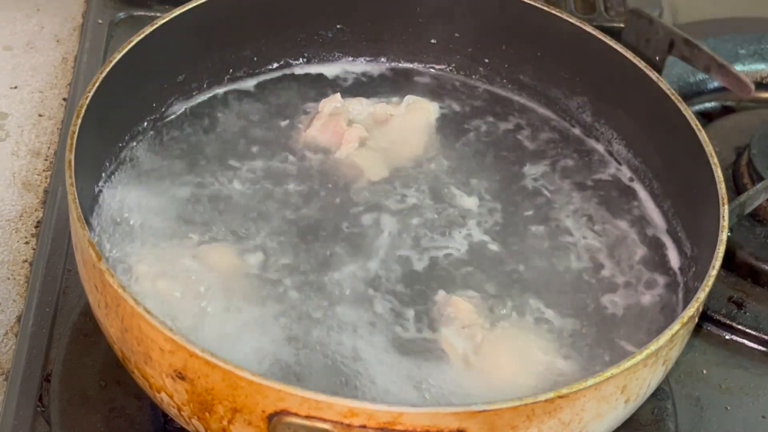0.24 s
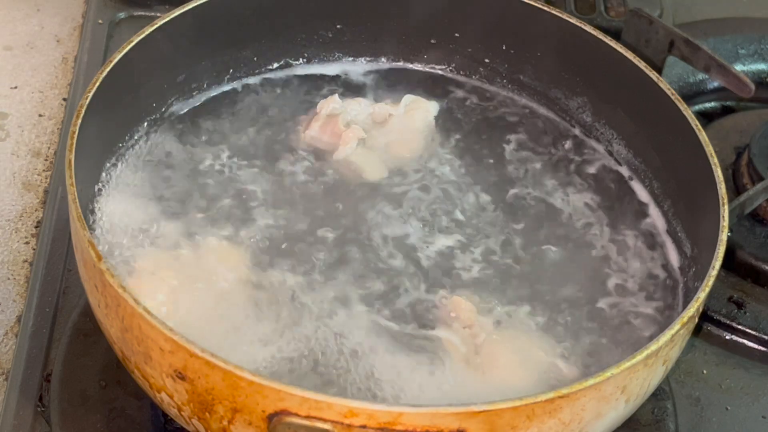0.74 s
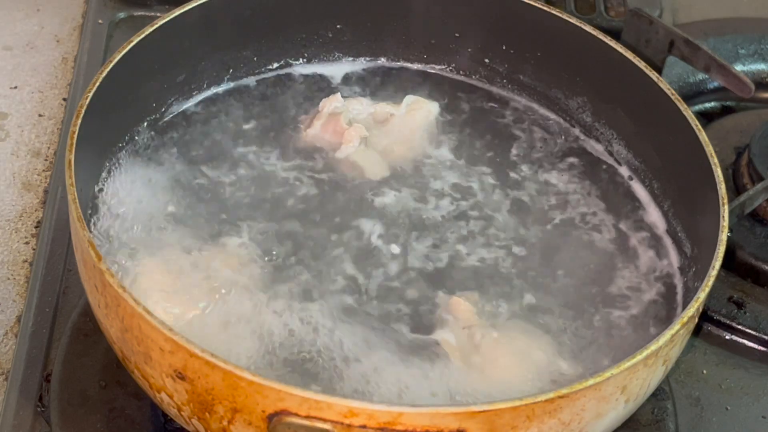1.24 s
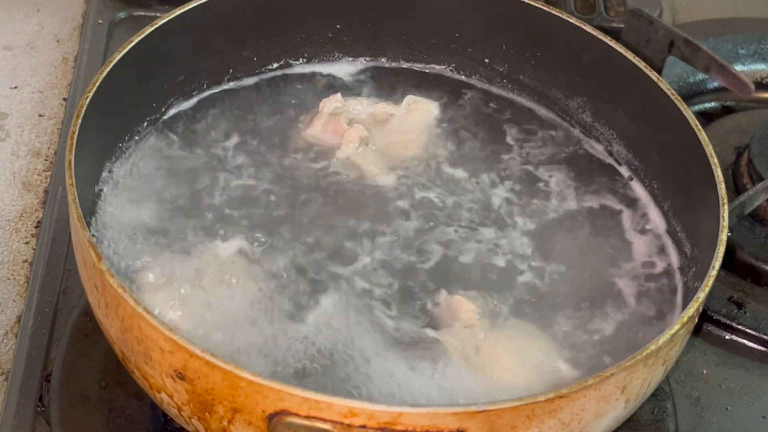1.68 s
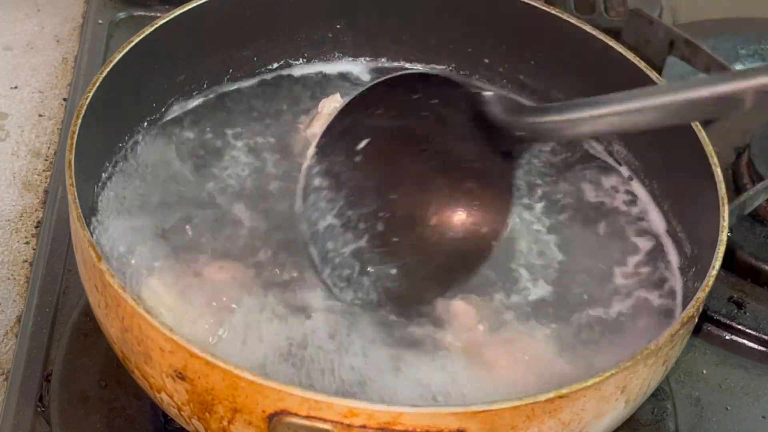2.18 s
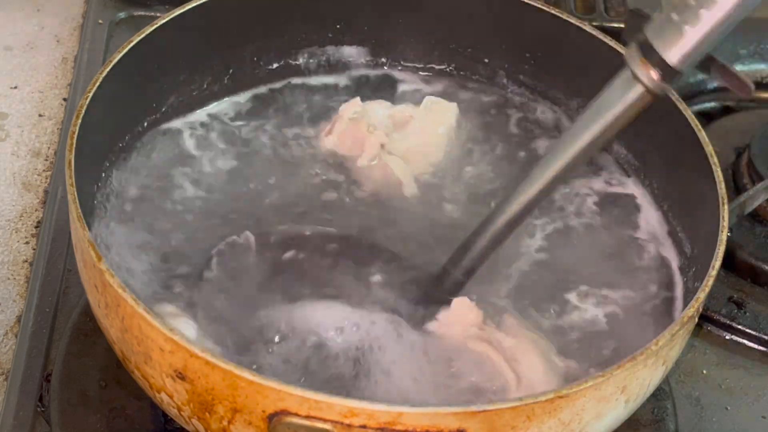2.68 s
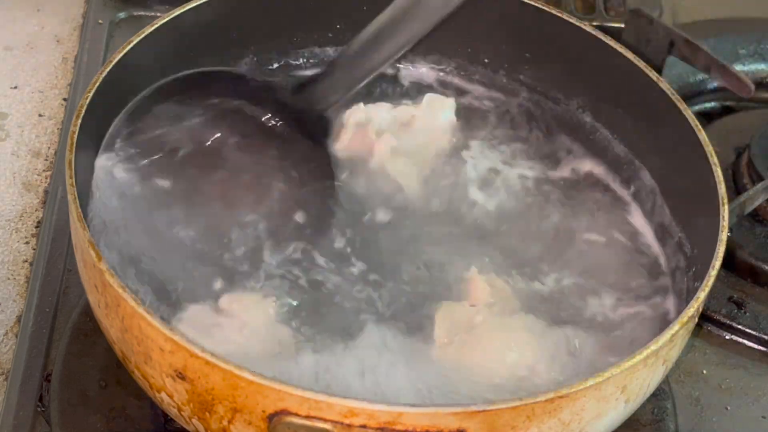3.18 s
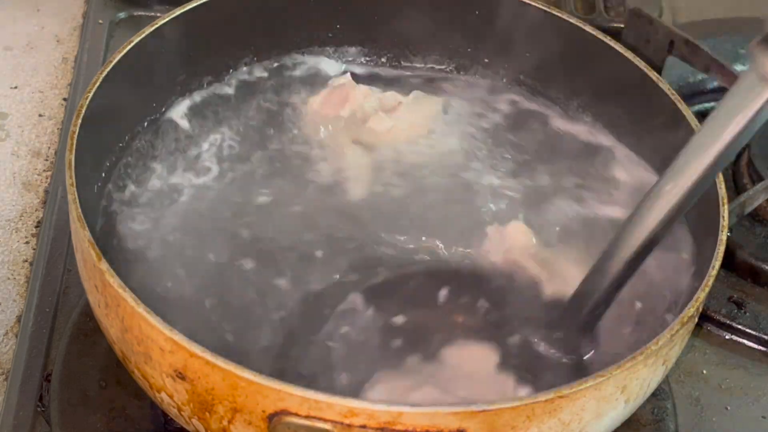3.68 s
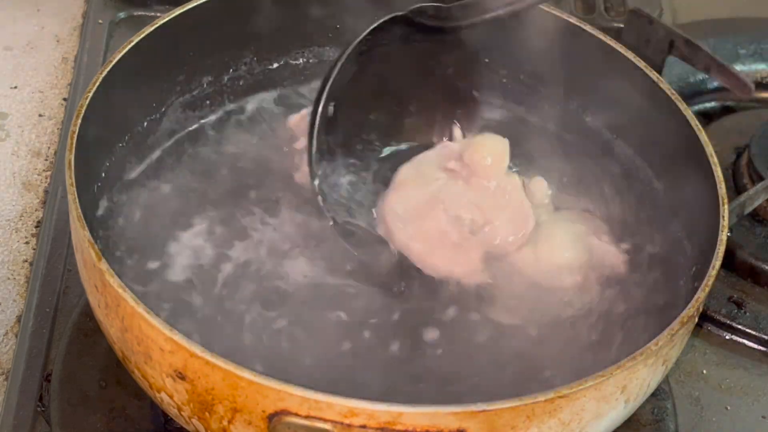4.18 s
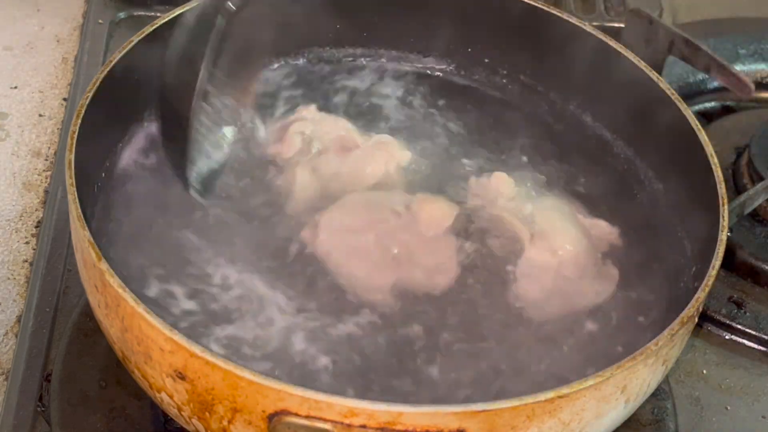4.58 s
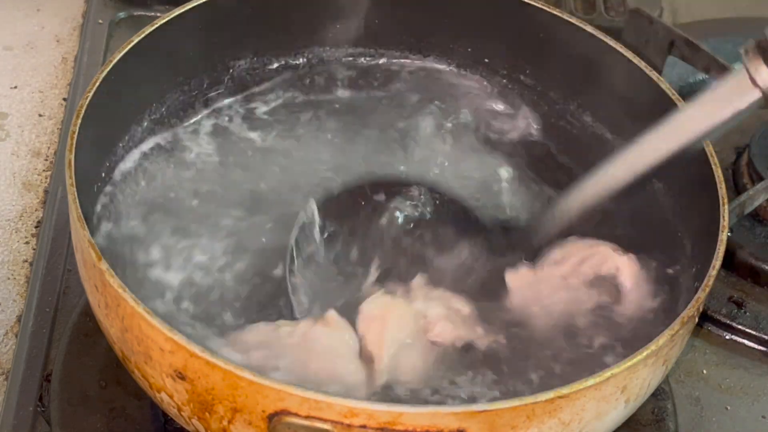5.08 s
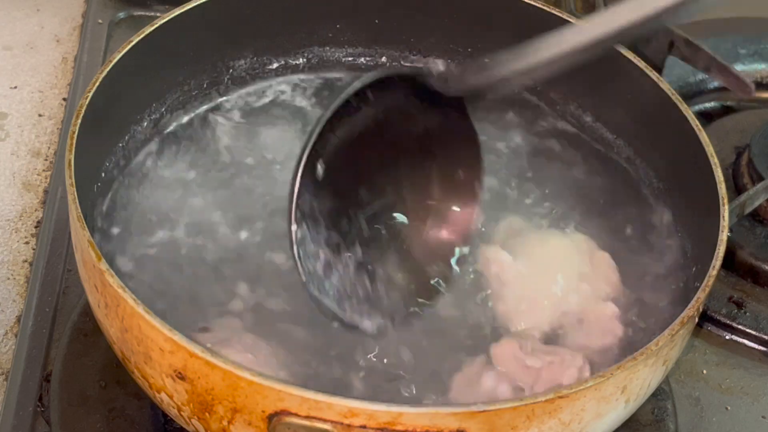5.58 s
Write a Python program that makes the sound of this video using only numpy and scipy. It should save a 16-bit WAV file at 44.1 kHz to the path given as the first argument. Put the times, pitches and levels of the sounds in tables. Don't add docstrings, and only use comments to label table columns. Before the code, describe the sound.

A small kitchen, heard close up in stereo. Throughout, water boils hard in a wide pan: a dense, slightly resonant roar of bubbles with fine steam hiss and a very faint high whistle, over the low, fluttering drone of an extractor fan that swells in short gusts. Small froth crackles and fat spits are scattered over it. At 1.3 s a hard, bright metal knock rings nearby and dies quickly in the room. From 1.9 s a ladle goes in with a fizzing spray; rapid ticks and light clinks cluster from 2.1 to 2.6 s, with dry droplet pops around 2.5 s. Dribbling water and knocks on pan and meat continue, notably near 2.9 and 3.2 s, thinning out toward 4.4 s. At 4.64 s a second metal knock lands, duller and bassier but sharp-edged. Hollow bubble plops and soft pan rings follow until about 5.7 s, while the boil continues.

```python
import sys
import numpy as np
from scipy import signal
from scipy.fft import rfft, irfft
from scipy.io import wavfile
from scipy.ndimage import uniform_filter1d, map_coordinates

SR = 44100
rng = np.random.default_rng(int(sys.argv[2]) if len(sys.argv) > 2 else 0)


def wav_out(sig):
    wavfile.write(sys.argv[1], SR, np.round(np.clip(np.atleast_2d(sig).T, -1, 1) * 32767).astype(np.int16))


def volts_from_db(level):
    exponent = np.asarray(level, float) / 20
    return 10 ** exponent


N = 257544
TIME = np.arange(N) / SR
BINS_HZ = np.maximum(np.fft.rfftfreq(N, 1 / SR), 1)
WALL_SHARE = 1.76
SPRAY_RISE_DB_PER_S = 900

# (frequency [Hz], width [Hz], level [dB])
LADLE_MODES = [(4560, 140, -3), (4920, 180, 3), (5160, 110, -4), (3600, 340, 2)]


def rms_one(x):
    return x / np.sqrt(np.mean(x ** 2) + 1e-20)


def at_hz(points, hz):
    points_hz, points_db = np.transpose(points)
    return np.interp(np.log(hz), np.log(points_hz), points_db)


def drift(rate_hz):
    knots = rng.standard_normal(400)
    return rms_one(map_coordinates(knots, [TIME * 2 * rate_hz], order=3, mode="mirror"))


def resonate(x, hz, width_hz):
    r = np.exp(-np.pi * width_hz / SR)
    feedback = [1, -2 * r * np.cos(2 * np.pi * hz / SR), r * r]
    return signal.lfilter([(1 - r * r) / 2, 0, (r * r - 1) / 2], feedback, x)


def coloured(x, gain):
    return rms_one(irfft(rfft(x) * gain, N))


def band(x, low_hz, high_hz):
    return signal.sosfilt(signal.butter(2, [low_hz, high_hz], "band", fs=SR, output="sos"), x)


def add(out, s, sound):
    i = round(s * SR)
    out[..., i:i + sound.shape[-1]] += sound[..., :N - i]


def held(start_s, length_s, db, rise_db_per_s, fall_db_per_s):
    before_s = np.maximum(start_s - TIME, 0)
    after_s = np.maximum(TIME - start_s - length_s, 0)
    return volts_from_db(db - rise_db_per_s * before_s - fall_db_per_s * after_s)


def hump(s, db, half_s):
    return volts_from_db(db) * np.exp(-((TIME - s) / half_s) ** 2)


def grains(per_s, spread_db):
    sizes = volts_from_db(spread_db * np.minimum(rng.exponential(1, (2, N)), 5))
    signed = sizes * rng.choice([-1, 1], (2, N))
    return rms_one(signed * (rng.random((2, N)) < per_s / SR))


def rough_ring(t, hz, db, t60_s, rise_s, rough):
    shake = rng.standard_normal((2, 2, len(t)))
    shake = uniform_filter1d(uniform_filter1d(shake, size=90), size=90) * 11
    wobble = 1 + rough * (shake[0] + 1j * shake[1])
    tone = wobble * np.exp(2j * np.pi * (hz * t + rng.random((2, 1))))
    return volts_from_db(db - 60 * t / t60_s) * (1 - np.exp(-t / rise_s)) * tone.imag


def short_rings(rows, rough):
    out, t = np.zeros((2, N)), TIME[:SR // 6]
    for s, hz, db, t60_s in rows:
        add(out, s, rough_ring(t, hz, db, t60_s, 0.4 * t60_s ** 2, rough))
    return out


def dry_clicks(rows, low_hz):
    lift_db, t60_s = 7, 0.0036
    out, t = np.zeros((2, N)), TIME[:SR // 64]
    fizz = rng.standard_normal((len(rows), 2, len(t))) * volts_from_db(-10.5 - 60 * t / t60_s)
    for (s, db), sound in zip(rows, fizz):
        add(out, s, volts_from_db(db + lift_db) * band(sound + (t == 0), low_hz, 18000))
    return out


def contact_bursts(rows):
    out, t = np.zeros((2, N)), TIME[:SR // 16]
    shape = (1 - np.exp(-t / 0.00065)) * (volts_from_db(-60 * t / 0.0091) + volts_from_db(-5 - 60 * t / 0.084))
    bursts = rng.standard_normal((len(rows), 2, len(t))) * [[1], [WALL_SHARE]]
    for (s, mid_db, low_db, high_db), burst in zip(rows, bursts):
        snap = burst * shape
        mid = band(snap, 1700, 6470) + 1.14 * resonate(snap, LADLE_MODES[1][0], 180)
        low_gain = max(volts_from_db(low_db) - volts_from_db(-41.0), 0)
        low = low_gain * band(snap, 200, 2170)
        high = band(snap, 5000, 15000)
        add(out, s, volts_from_db(mid_db - 1.0) * mid + 1.53 * low + volts_from_db(high_db + 12.0) * high)
    return out


def fan():
    shaft_hz, flutter_db, flutter_hz, swell_lift_db = 23.81, 2.5, 5.5, -0.3
    drone_db = [-49.5, -44, -45.5, -45.5]
    # (time [s], shaft order [1], level [dB], half length [s])
    gusts = [(0.723, 3, -37.5, 0.079), (0.85, 5, -46, 0.12), (1.132, 2, -45.5, 0.17),
             (1.157, 4, -34.5, 0.069), (1.35, 5, -36, 0.034), (1.423, 4, -34.5, 0.035),
             (1.805, 4, -36, 0.05), (1.99, 3, -42, 0.089), (2.123, 4, -37, 0.063), (2.4, 5, -43.5, 0.13),
             (2.508, 4, -40, 0.034), (2.725, 3, -44, 0.09), (2.817, 4, -34, 0.053), (2.987, 3, -45.5, 0.15),
             (3.018, 5, -42, 0.06), (3.26, 5, -37, 0.038), (3.385, 4, -39, 0.073), (3.44, 3, -40.5, 0.06),
             (3.65, 4, -36.5, 0.049), (3.716, 2, -40, 0.054), (4.024, 5, -31.5, 0.085),
             (4.04, 4, -45, 0.12), (4.282, 2, -44, 0.19), (4.743, 2, -44, 0.063), (4.922, 5, -44.5, 0.2),
             (5.49, 5, -38.5, 0.032), (5.63, 3, -43.5, 0.12), (5.67, 4, -44.5, 0.047),
             (5.683, 5, -38, 0.035), (5.816, 3, -41, 0.035)]
    # (order [1], width [Hz], level [dB])
    upper_orders = [(6, 6.2, -45), (7.956, 3.3, -49.5), (8.82, 1.4, -55.5), (10.074, 4.3, -54),
                    (11.03, 13, -52.5), (13.426, 6.5, -54.5), (18.02, 15, -53.5), (19.98, 23, -58.5),
                    (22.245, 6.3, -51.5)]
    out = np.zeros(N)
    for order, level_db in enumerate(drone_db, start=2):
        swells = sum(hump(s, db + swell_lift_db, half_s) for s, swelling, db, half_s in gusts
                     if round(swelling) == order)
        gain = volts_from_db(level_db + flutter_db * drift(flutter_hz)) + swells
        out += np.sqrt(2) * gain * np.sin(2 * np.pi * order * shaft_hz * TIME + 1.66 * drift(3.0))
    for order, width_hz, level_db in upper_orders:
        narrow = resonate(rng.standard_normal(N + SR), order * shaft_hz, width_hz)[SR:]
        out += volts_from_db(level_db) * rms_one(narrow)
    return out


def boil():
    roar_mean_db, hiss_mean_db, hiss_follows = -39, -59, 0.25
    whistle_hz, whistle_width_hz, whistle_db = 11434, 96, -71.5
    # (time [s], roar level [dB])
    vigour = [(0.0, -39.5), (0.75, -42.5), (1.32, -38.5), (1.59, -40), (2.89, -41), (4.08, -39),
              (4.34, -40.5), (5.55, -39.5), (5.84, -42)]
    # (frequency [Hz], density [dB per Hz])
    air = [(24, -50), (40, -11), (75, -5), (112, -5), (302, -13.5), (520, -11), (587, -18.5), (795, -18),
           (973, -23), (1400, -26), (1610, -27), (1900, -27), (2620, -32), (5000, -42.5), (6500, -55),
           (11000, -120)]
    # (frequency [Hz], width [Hz], lift [dB])
    pan_modes = [(242.3, 25, 5.5), (431, 74, 5.5), (516, 42, -0.5), (654, 30, 8), (840, 185, 4),
                 (1197, 157, 9.5), (1413, 115, 10), (1750, 48, 8), (1920, 450, 6.5), (2430, 120, 2.5),
                 (2920, 41, 8.5)]
    # (frequency [Hz], density [dB per Hz])
    steam = [(2000, 8), (3000, 6), (5000, 4), (7000, 1.5), (8500, -1), (11000, -3.5), (13000, -0.5),
             (15000, -4), (15750, -7), (15900, -45)]

    swing_db = np.interp(TIME, *np.transpose(vigour))
    swing_db = swing_db - np.mean(swing_db)
    lift = 1 + sum((volts_from_db(db) - 1) / (1 + ((BINS_HZ - hz) / (0.31 * width_hz)) ** 2)
                   for hz, width_hz, db in pan_modes)
    drive = rng.standard_normal((2, N)) + 0.41 * grains(per_s=1200, spread_db=2.8)
    roar = coloured(drive, volts_from_db(at_hz(air, BINS_HZ)) * lift)
    roar = roar * volts_from_db(roar_mean_db + swing_db + 1.3 * drift(8.0))

    spray = rng.standard_normal((2, N)) + 0.25 * grains(per_s=400, spread_db=3.5)
    hiss = coloured(spray, volts_from_db(at_hz(steam, BINS_HZ)) * (BINS_HZ > 1500))
    hiss = hiss * volts_from_db(hiss_mean_db + hiss_follows * swing_db + 1.0 * drift(22.0))

    whistle_gain = 1 / (1 + (2 * (BINS_HZ - whistle_hz) / whistle_width_hz) ** 2)
    whistle = coloured(rng.standard_normal((2, N)), whistle_gain)
    return roar + hiss + volts_from_db(whistle_db) * whistle


def clear_rings():
    # (time [s], pitch [Hz], level [dB],
    # t60 [s])
    struck = [(0.034, 1900, -42, 0.058), (1.388, 248, -23, 0.19), (2.2585, 1750, -33, .03),
              (2.2585, 2210, -38, 0.022), (2.895, 1800, -34, 0.024), (2.912, 2310, -40, 0.031),
              (3.171, 1050, -49, .04), (3.172, 460, -27.5, 0.11), (3.173, 2900, -44, 0.023),
              (3.188, 4640, -50, .12), (4.653, 1700, -39, 0.065), (4.7, 118, -23, 0.075),
              (4.6368, 12000, -32, .012), (4.6368, 14700, -30, .012), (4.6368, 15700, -30, .012),
              (4.65, 893, -32, 0.069), (4.67, 500, -34, .07), (4.73, 490, -44, .08),
              (5.01, 474, -29, 0.089), (5.07, 1430, -39, .07), (5.165, 547, -39, 0.13),
              (5.34, 1270, -38, 0.089), (5.39, 1190, -32, 0.045), (5.52, 1340, -46, .1),
              (5.67, 1220, -46, 0.047), (5.71, 1190, -44, .06), (3.06, 262, -41, 0.24),
              (3.46, 262, -27, .2), (3.97, 270, -35, 0.26), (3.93, 186.5, -34, 0.19), (5.5, 262, -37, 0.24)]
    return short_rings(struck, rough=0.05)


def crackle():
    # (time [s], peak level [dB])
    froth = [(0.7344, -45), (1.1354, -47), (1.4744, -41), (1.7994, -49), (1.8964, -46), (2.0334, -47),
             (2.0813, -45), (2.1334, -43), (2.3224, -37), (2.6594, -44), (2.6904, -45), (2.7162, -44),
             (2.7586, -47), (2.91, -43), (2.9746, -40), (3.1724, -44), (3.1772, -39), (3.8724, -50),
             (4.0704, -46), (4.4238, -43), (5.8037, -41)]
    return dry_clicks(froth, low_hz=2500)


def fat_spits():
    # (time [s], peak level [dB])
    spits = [(0.7394, -52), (1.0194, -44), (1.1694, -52), (1.4794, -50), (1.6994, -46), (3.0194, -49),
             (3.5294, -44), (3.6336, -45), (4.0694, -48), (4.2994, -47), (5.0883, -43), (5.5707, -47)]
    return contact_bursts([(s, db, -90, db - 16) for s, db in spits])


def single_bubbles():
    # (time [s], pitch [Hz], level [dB], t60 [s])
    pockets = [(0.9680, 1740, -39, 0.026), (2.258, 1140, -28, 0.044), (2.2588, 800, -32, 0.032),
               (2.2590, 444, -27, 0.046), (2.2592, 2700, -40, 0.023), (2.8940, 435, -24, 0.093),
               (2.8942, 1140, -31, .035), (2.8945, 2300, -41, .030), (2.9050, 930, -40, 0.059),
               (2.9100, 770, -35, 0.099), (2.9120, 1800, -39, 0.047), (3.1680, 1740, -39.5, 0.067),
               (3.1720, 590, -45, .050), (3.1770, 5500, -46, .060), (3.1800, 4640, -41, 0.11),
               (3.1870, 1870, -36, 0.055), (3.1900, 5500, -49, .040), (3.1920, 4640, -43, 0.11),
               (4.6050, 1750, -33, 0.31), (4.7250, 1740, -39, 0.15), (4.7700, 1803, -36, 0.072),
               (4.9600, 1410, -33, 0.083), (5.0200, 1990, -43, .040), (5.2200, 474, -31, 0.16),
               (5.2300, 1410, -39, .078), (5.3500, 1920, -40, 0.12), (5.3850, 1740, -39, 0.071),
               (5.4100, 448, -25.5, 0.26)]
    return short_rings(pockets, rough=0.28)


def knocks():
    slap_s, slap_db = 4.6404, -9
    # (time [s], crack level [dB], tail level [dB], rise [s])
    hits = [
        (1.32, -19.5, -27.5, 0.0003),
        (4.6372, -21, -28, 0.00045),
    ]
    # (frequency [Hz], level [dB], t60 [s])
    hit_modes = [
        [(255.8, -21.5, 0.27), (495, -24, 0.25), (853, -35.5, 0.28), (1322, -22.5, 0.09), (1257, -32, 0.26),
         (1740, -23.5, 0.11), (1900, -30.5, 0.13), (2497, -30, .07), (2720, -27, 0.08), (2970, -23, 0.038),
         (3150, -18.5, 0.025), (3420, -27, 0.035), (5230, -24, 0.039), (5560, -39, 0.12), (6750, -44, .04)],
        [(221, -19.5, 0.12), (165, -21, 0.063), (400, -15, 0.049), (930, -23.5, 0.11), (1073, -21.5, 0.1),
         (1750, -20, 0.047), (2050, -24.5, 0.036), (2510, -25, 0.035), (4020, -26, 0.082), (5040, -31, 0.061),
         (5180, -27, .05), (5520, -28, 0.09), (7650, -41, 0.15)],
    ]
    # (frequency [Hz], density [dB per Hz])
    hit_colours = [
        [(150, -10), (600, 2), (1700, 0.5), (2500, -4), (3200, -6), (3800, -11), (4500, -22), (5300, -16),
         (6000, -6), (8000, -27), (9000, -11.5), (11500, -27), (13300, -26), (15200, -24)],
        [(150, 2), (450, -4), (700, -6), (1000, 1), (1800, -8.5), (3000, -9.5), (4100, -9.5), (4600, -17),
         (5400, -1), (6000, -18), (7500, -22), (11000, -21), (13300, -27), (15000, -24), (16000, -20)],
    ]
    bloom_cycles = [3.03, 0.877]
    # (frequency [Hz], t60 [s])
    room_t60 = [(200, 0.59), (1000, 0.25), (4000, 0.23), (10000, 0.17)]

    out, t = np.zeros((2, N)), TIME[:SR // 2]
    edges_hz = np.geomspace(120, 16200, 32)
    for hit, modes, colour, cycles in zip(hits, hit_modes, hit_colours, bloom_cycles):
        s, crack_db, tail_db, rise_s = hit
        sound = np.zeros((2, len(t)))
        for low_hz, high_hz in zip(edges_hz, edges_hz[1:]):
            hz = np.sqrt(low_hz * high_hz)
            swell = 1 - np.exp(-t / (rise_s + 0.95 / hz))
            crack = volts_from_db(crack_db + 3.1 * hz / 10000 - 60 * t * (1 + hz / 12000) / 0.028)
            tail = volts_from_db(tail_db - 60 * t / at_hz(room_t60, hz))
            noise = band(rng.standard_normal(sound.shape), low_hz, high_hz)
            sound += noise * swell * (crack + tail) * volts_from_db(at_hz(colour, hz) + 11.0)
        for hz, db, t60_s in modes:
            late = np.maximum(t - cycles / hz, 0)
            sound += rough_ring(late, hz, db, t60_s, rise_s + 1.3 / hz, rough=min(hz / 20000, 0.16))
        sound[1] += WALL_SHARE * band(sound[1], 2370, 17000)
        add(out, s, sound)
    add(out, slap_s, -volts_from_db(slap_db) * np.hanning(7) * [[1], [WALL_SHARE]])
    return out


def splash():
    spray_fall, dribble_fall, bowl_fall = 90, 17, 23
    # (start [s], length [s], spray level [dB])
    sheets = [
        (1.922, 0.47, -63),
        (2.457, 0.12, -63),
        (2.62, 0.64, -70.5),
    ]
    # (frequency [Hz], density [dB per Hz])
    spray_colour = [(1500, -22), (2500, -5), (3500, 4), (5000, 2), (7000, 2), (9500, 5), (12000, 3),
                    (15000, 5), (15750, 2), (15950, -30)]
    # (time [s], level [dB])
    wrist_turns = [(2.1, -77), (2.42, -64), (2.7, -64), (2.95, -67), (3.3, -73)]

    falls = [spray_fall, spray_fall, dribble_fall]
    flow = np.max([held(*row, SPRAY_RISE_DB_PER_S, fall) for row, fall in zip(sheets, falls)], axis=0)
    wet = held(2.085, 1.2, -63.5, SPRAY_RISE_DB_PER_S, bowl_fall)
    wet = wet + sum(hump(s, db, half_s=0.06) for s, db in wrist_turns)

    sheet, drops = rng.standard_normal((2, N)), grains(per_s=900, spread_db=3.2)
    fizz = coloured(sheet + 0.7 * drops, volts_from_db(at_hz(spray_colour, BINS_HZ)))
    fizz = fizz * flow * volts_from_db(7.0 + 1.5 * drift(25.0))
    patter = 0.4 * sheet + drops
    ring = rms_one(sum(volts_from_db(db) * resonate(patter, hz, width_hz) for hz, width_hz, db in LADLE_MODES))
    return fizz + wet * volts_from_db(drift(18.0)) * ring


def pops():
    # (time [s], peak level [dB])
    droplets = [(1.924, -48), (2.3999, -45), (2.4608, -34), (2.4664, -39), (2.4848, -38), (2.5032, -42),
                (2.5084, -42), (2.5311, -47), (2.579, -40), (2.5834, -47), (2.819, -43), (3.4585, -45),
                (3.7279, -47), (4.0088, -48)]
    return dry_clicks(droplets, low_hz=3000)


def stirred():
    # (time [s], level [dB])
    surges = [(4.76, -50), (4.97, -57), (5.24, -53), (5.4, -42.5)]
    clicks, dealt = grains(per_s=1500, spread_db=1.2), rng.integers(0, 14, N)
    rings = np.zeros((2, N))
    for k, hz in enumerate(np.geomspace(320, 2050, num=14)):
        rings += resonate(clicks * (dealt == k) + 1e-18, hz, hz / 22)
    welling = held(2, 3.2, -65.5, rise_db_per_s=100, fall_db_per_s=28)
    welling = welling + sum(hump(s, db, half_s=0.046) for s, db in surges)
    return welling * rms_one(rings)


def ladle_ticks():
    # (time [s], peak level [dB], thud level [dB], sparkle level [dB])
    contacts = [(2.0802, -36.5, -46, -59), (2.197, -38.5, -35, -63), (2.246, -38, -32, -63),
                (2.2577, -35, -34, -60), (2.3022, -34, -32, -54), (2.347, -35.5, -28, -54),
                (2.384, -38, -37, -58), (2.4004, -33.5, -35, -56), (2.4654, -37, -27.5, -52),
                (2.4848, -49, -30, -53), (2.5085, -39, -46, -54), (2.5294, -39, -47, -52),
                (2.583, -34, -54, -51), (2.7162, -47, -32, -62), (2.7586, -46, -28.5, -65),
                (2.819, -43, -44, -56), (2.8389, -41, -43, -56), (2.8945, -40, -26.5, -61),
                (2.9093, -44, -27.5, -63), (2.9811, -38, -44, -63), (3.0576, -31, -52, -52),
                (3.1714, -51, -28, -63), (3.1905, -33, -43, -63), (3.459, -41, -35, -57),
                (3.7269, -39, -43, -56), (3.929, -40, -46, -58.5), (4.007, -39.5, -42, -56),
                (4.4238, -42, -35, -62), (4.779, -46, -31, -68), (5.3911, -52, -30, -70)]
    return contact_bursts(contacts)


def microphone_pair(sound):
    # (frequency [Hz], likeness [0-1], left minus right [dB], right side's lead [turns])
    ports = [(100, 1., -1.2, 0), (300, .84, -2.5, -.02), (700, .72, -2, -.15), (1050, .2, -1, -.3),
             (1500, .15, -6, -.8), (1850, .85, -6.5, -.98), (2250, .96, -3, -1.02), (2700, .985, -1, -1.02),
             (3300, .995, 0, -1.01), (5300, .995, 0, -.97), (5900, .97, 0, -.85), (7200, .97, 0, -.72),
             (7900, .98, 0, -.56), (8700, .98, 0, -.46), (10600, .97, 0, -.13), (11200, .99, 0, -.03),
             (12600, .99, 0, .04), (13200, .97, 0, .15), (14200, .97, 0, .33), (14700, .99, 0, .46),
             (15800, .99, 0, .5)]
    common, twin = rfft(sound)
    hz, *columns = np.transpose(ports)
    alike, balance_db, turns = (np.interp(BINS_HZ, hz, column) for column in columns)
    same, apart = np.sqrt((1 + alike) / 2) * common, np.sqrt((1 - alike) / 2) * twin
    left = (same + apart) * volts_from_db(balance_db / 2) * np.exp(-1j * np.pi * turns)
    right = (same - apart) * volts_from_db(-balance_db / 2) * np.exp(1j * np.pi * turns)
    return irfft(np.array([left, right]), N)


def scene():
    steady = fan() * [[1], [0]] + boil()
    small = clear_rings() + crackle() + fat_spits() + single_bubbles()
    ladle = splash() + pops() + stirred() + ladle_ticks()
    return microphone_pair(steady + small + knocks() + ladle)


def top_cut(x):
    return signal.sosfilt(signal.butter(12, 16470, fs=SR, output="sos"), x)


def record(dry):
    cut = signal.sosfilt(signal.butter(2, 30, "high", fs=SR, output="sos"), dry)
    cut = signal.sosfilt(signal.cheby2(16, 60, 16500, fs=SR, output="sos"), cut)
    fade_in = np.clip(0.5 + TIME / 0.0061, 0, 1)
    return top_cut(cut * fade_in)


dry = scene()
out = record(dry)
wav_out(out)
```